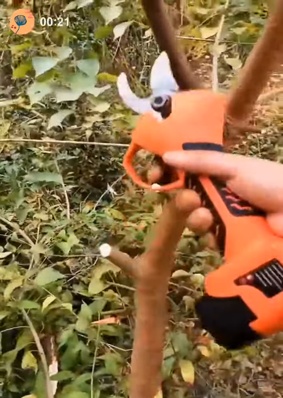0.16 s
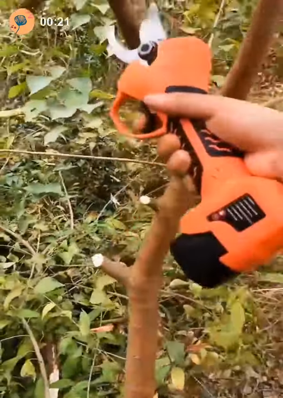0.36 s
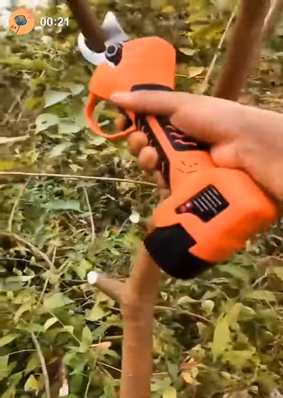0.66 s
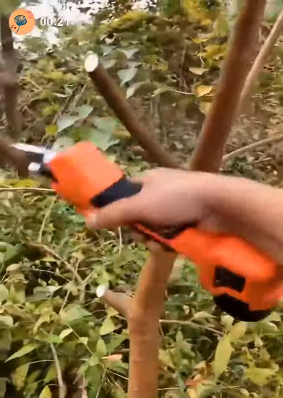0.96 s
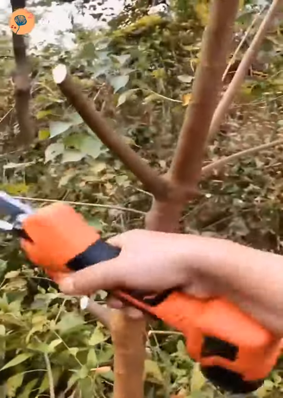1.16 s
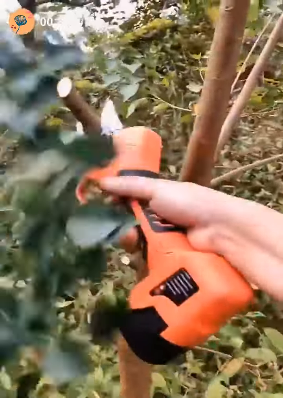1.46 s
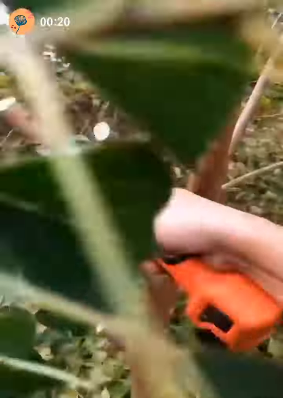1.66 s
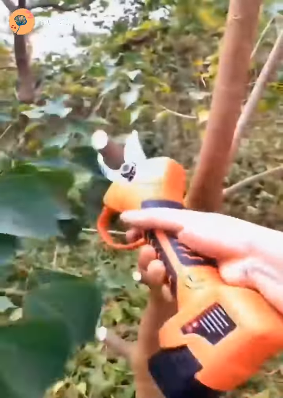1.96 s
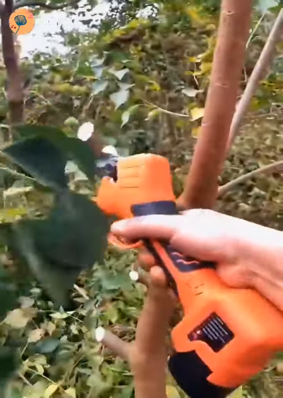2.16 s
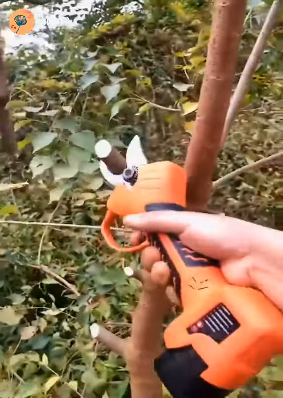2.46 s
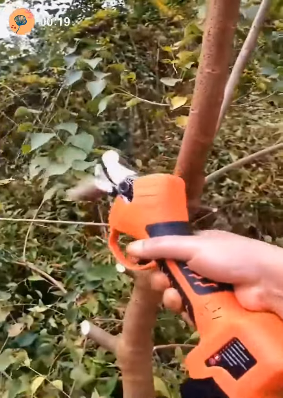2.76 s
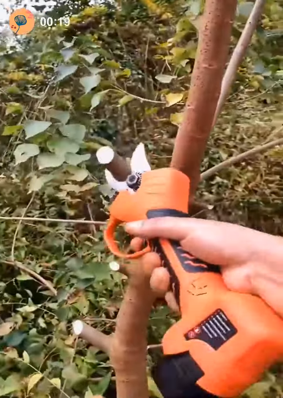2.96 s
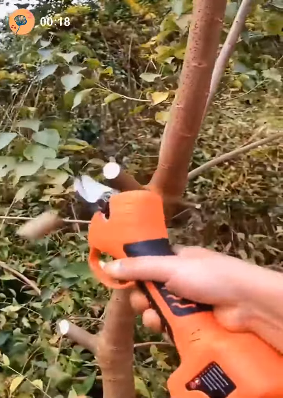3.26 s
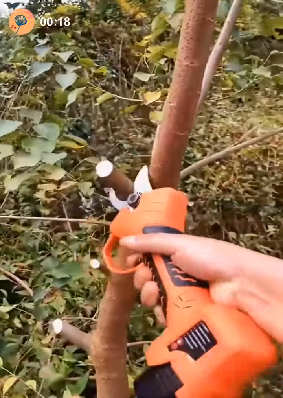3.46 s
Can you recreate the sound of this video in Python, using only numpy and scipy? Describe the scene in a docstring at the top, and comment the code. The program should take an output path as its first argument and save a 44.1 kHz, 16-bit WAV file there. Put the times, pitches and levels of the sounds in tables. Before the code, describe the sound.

An electric pruning shear, close and dry, mono, outdoors. Faint wind and leaf rustle until 0.7 s, when a click starts a shrill gear whine with rattle, about 0.2 s long; a steadier opening whirr follows at 0.97. Leaves hiss from 1.35; the cut at 1.5 drops a branch, knocking and rumbling at 1.67-1.9. Closing whines sag under load at 2.04, 2.56, 3.03 and 3.56, with opening whirrs between and small wood snaps.

```python
"""Cordless pruning shear among branches

A shear closes and opens in quick strokes. Each stroke starts with a click of gear slack; the gear whine,
partials on a mesh-speed curve, spins up and brakes, sagging while a closing blade bites. Gear rattle is
noise coloured by the housing. Knocks of wood are dying modes with a tick; a cut branch falls through
leaves, whose hiss breaks into crackles. Light wind is low, patchy noise."""
import sys
import numpy as np
from scipy import signal
from scipy.fft import rfft, irfft
from scipy.io import wavfile
from scipy.ndimage import uniform_filter1d

SR = 44100
rng = np.random.default_rng(int(sys.argv[2]) if len(sys.argv) > 2 else 0)


def voltage_ratio(decibels):
    """Convert decibels (scalar or array-like) to amplitude ratios, 20 dB per decade."""
    exponent = np.asarray(decibels, float) / 20
    return 10 ** exponent


def master(y):
    """Save y as 16-bit WAV."""
    cut = np.clip(np.atleast_2d(y).T, -1, 1)
    pcm = np.round(cut * 32767)  # scale
    wavfile.write(sys.argv[1], SR, pcm.astype(np.int16))


N = 158760
T = np.arange(N) / SR
WAIT_S, SPIN_UP_S, FREE_HZ = 0.012, 0.024, 3768  # trigger to motor start, run-up, unloaded mesh

# Closing strokes: trigger t/s, trigger to cut-through t/s, free run to brake t/s, mesh at full load f/Hz,
# whine level/dB
CLOSING_STROKES = [(.694, 0.184, 0.012, 2664, -15.5), (1.504, 0.18, 0.017, 2678, -15),
                   (2.042, 0.18, 0.023, 2555, -15), (2.557, 0.18, 0.0092, 2608, -15.5),
                   (3.028, .192, .024, 2563, -14.5), (3.564, .18, .02, 2600, -17.5)]
# Opening strokes: trigger t/s, trigger to brake t/s, whine level/dB
OPENING_STROKES = [(.973, .158, -17), (1.758, .157, -15.5), (2.296, .156, -17.5), (2.802, .155, -17),
                   (3.303, .153, -16)]
# Gear-train partials: multiple of mesh [1], free-running level/dB, full-load level/dB
GEAR_ORDERS = [(0.094, -20.5, -34.5), (.235, -16.5, -23.5), (.5, -23, -6.5), (0.753, -5.5, -5), (1, 1, 6.5),
               (1.068, -14, -9), (1.192, -28.5, -57), (2, -22, -13.5), (2.982, -20, -23), (3.168, -26, -28)]


def shear():
    """All strokes share one set of housing resonances and one gear train with 14 faint extra partials."""
    out = np.zeros(N)
    width = round(220 * N / SR)  # 220 Hz in bins
    bands = uniform_filter1d(rng.standard_normal(N // 2 + 1), size=width)
    bands = evened(uniform_filter1d(bands, size=width))
    faint_db = -27
    orders = [*GEAR_ORDERS, *((k, faint_db, faint_db) for k in rng.uniform(2.1, 4.1, size=14))]
    for start, to_cut, free, bite_hz, db in CLOSING_STROKES:
        cut = start + to_cut
        add(out, *stroke(start, cut, cut + free, bite_hz, db, True, bands, orders))
    for start, to_brake, db in OPENING_STROKES:
        brake = start + to_brake
        add(out, *stroke(start, brake, brake, FREE_HZ, db, False, bands, orders))
    return out


def stroke(start, cut, brake, bite_hz, db, closing, bands, orders):
    """Click, whine and rattle driven by one load and speed curve; placed 2 ms ahead of the trigger."""
    t = np.arange(start, min(brake + 0.12, N / SR), 1 / SR)
    full = start + WAIT_S + SPIN_UP_S
    load = closing * blade_load(t, full, cut)
    run = np.clip((t - start - WAIT_S) / SPIN_UP_S, 0, 1)
    braking = np.clip((t - brake) / (0.018 if closing else 0.035), 0, 1)
    speed, mesh_hz = gear_speed(t - full, run, braking, load, bite_hz, closing)
    turn = 2 * np.pi * np.cumsum(mesh_hz) / SR
    noise = housing_noise(bands)

    whine = gear_whine(mesh_hz, turn, load, orders)
    brake_drop_db = -6 * np.clip((t - brake) / 0.009, 0, 1)
    whine *= np.sqrt(2) * voltage_ratio(db + brake_drop_db) * np.clip(speed * 8, 0, 1) * run
    rattle = gear_rattle(t, start, brake, run, braking, load, turn, closing) * noise[:len(t)]
    click = slack_click(t - start, noise[-len(t):], closing)
    return start - 0.002, click + whine + rattle


# Blade load: share of the way from full speed to cut-through [1], load [0-1]
BITE_LOAD = [(0, 0.1), (.1, 0), (.22, .17), (.33, .45), (.43, 0.8), (.54, 0.81), (.7, 0.92), (.85, 0.98),
             (1, .7)]


def blade_load(t, full, cut):
    """Wood loads the blade along the cut, then frees it exponentially."""
    FREED_S = 0.0097
    return curve(BITE_LOAD, (t - full) / (cut - full)) * np.exp(-np.maximum(t - cut, 0) / FREED_S)


def gear_speed(since_full, run, braking, load, bite_hz, closing):
    """Relative speed and mesh rate: lagged run-up, sag with load, fall to a creep rate on braking."""
    SETTLE_S, CREEP_HZ, CLIMB_HZ_PER_S = 0.005, 1000, 490
    lag = np.exp(-1 / (SETTLE_S * SR))
    speed = signal.lfilter([1 - lag], [1, -lag], run) * (1 - braking)
    top_hz = FREE_HZ + CLIMB_HZ_PER_S * since_full * (not closing)
    loaded_hz = top_hz - (FREE_HZ - bite_hz) * load
    return speed, uniform_filter1d(CREEP_HZ + (loaded_hz - CREEP_HZ) * speed, size=150)


# Whine passed by the housing: f/Hz, level/dB
WHINE_GAIN_POINTS = [(300, -14.5), (1000, -14.5), (2000, -13.5), (2650, -10), (3250, -5), (3750, -3.5),
                     (3830, 0.5), (4600, 1), (5500, 3), (6800, 3.5), (7500, -2), (8200, -9), (10500, -2)]


def gear_whine(mesh_hz, turn, load, orders):
    """Partials at multiples of mesh, wavering in level and phase, plus a noise band around mesh."""
    WAVER_DB, WAVER_HZ = 2.5, 141
    JITTER_RAD, JITTER_LOAD_RAD, JITTER_HZ = 0.06, 0.18, 250  # at mesh; grows with the multiple
    FUZZ_DB, FUZZ_HZ = -19, 300
    waver, shake, fuzz = wobble(WAVER_HZ), wobble(JITTER_HZ), wobble(FUZZ_HZ)
    n = len(turn)
    at = rng.integers(0, N - n, (len(orders), 2))  # excerpts of the drifts
    fuzz_cos, fuzz_sin = fuzz[at[0, 0]:][:n], fuzz[at[0, 1]:][:n]
    whine = voltage_ratio(FUZZ_DB) * (fuzz_cos * np.cos(turn) + fuzz_sin * np.sin(turn))
    whine *= voltage_ratio(curve(WHINE_GAIN_POINTS, mesh_hz))
    for (k, free_db, load_db), (a, b) in zip(orders, at):
        part_db = free_db + (load_db - free_db) * load
        part_db = part_db + curve(WHINE_GAIN_POINTS, k * mesh_hz)
        part_db += WAVER_DB * np.clip(k, 1, 2) * waver[a:a + n]
        jitter = min(k, 2.4) ** 2 * (JITTER_RAD + JITTER_LOAD_RAD * load) * shake[b:b + n]
        whine += voltage_ratio(part_db) * np.cos(k * turn + a + jitter)  # a: arbitrary phase
    return whine


def gear_rattle(t, start, brake, run, braking, load, turn, closing):
    """Rattle envelope: rises with run-up, dips with load and braking, throbs once per shaft turn."""
    RATTLE_DB, LOAD_DB, BRAKING_DB, STILL_DB = -23, -2.5, -6, -9
    RASP_ORDER, RASP_DEPTH, FADE_DB_PER_S = 0.066, 0.3, -1200
    end = brake + (0.024 if closing else 0.052)
    on = np.clip((t - start) / 0.0019, 0, 1) * voltage_ratio(FADE_DB_PER_S * np.maximum(t - end, 0))
    level_db = RATTLE_DB + LOAD_DB * load + STILL_DB * (1 - run) + BRAKING_DB * braking
    return on * (1 + RASP_DEPTH * np.cos(RASP_ORDER * turn)) * voltage_ratio(level_db)


# Rattle through the housing: f/Hz, level per Hz/dB
HOUSING_SPECTRUM = [(300, -61), (900, -13), (1180, 2), (1900, -10), (2700, 3), (4100, 4), (4800, -1),
                    (5500, -4.5), (7300, -4.5), (8200, -10.5), (9000, -4.5), (11000, -5.5), (15500, -8)]


def housing_noise(bands):
    """Grainy noise coloured by the housing and combed by its many small resonances, rms 1."""
    grain = patchy(2) * voltage_ratio(-1.5 * wobble(210))
    return combed(coloured(grain, HOUSING_SPECTRUM), bands)


# Slack click modes: f/Hz, level before scatter and stroke level/dB
CLICK_MODES = [(1400, -29), (3800, -24), (4450, -6), (5450, -9.5), (6850, 0.5), (9500, -33), (11500, -29)]


def slack_click(u, noise, closing):
    """Gear slack taken up: housing modes and noise swell briefly, then die."""
    RISE_S, T60_S, SCATTER_DB = 0.0052, 0.022, 3
    click = voltage_ratio(2.5 - 60 * u / T60_S) * noise
    for hz, db in CLICK_MODES:
        mode_db = db + SCATTER_DB * rng.standard_normal()
        click += ring(np.maximum(u - RISE_S, 0), 0, mode_db, T60_S, turns=hz * u)  # decays after the rise
    return click * voltage_ratio(-24.5 if closing else -23) * np.minimum(u / RISE_S, 1)


# Wood snapping or knocking: t/s, body level/dB, body f/Hz, crack level/dB
WOOD_KNOCKS = [(.056, -34.5, 517, -35), (0.164, -26, 4600, -30), (1.354, -30, 1000, -34),
               (1.666, -15, 735, -33), (1.671, -16.5, 202, -40), (1.75, -17, 645, -10.5),
               (1.768, -9.5, 1000, -22), (1.777, -13, 850, -16), (1.843, -5.5, 874, -22),
               (1.85, -7.5, 513, -10), (1.86, -23, 88, -28), (1.866, -15.5, 392, -33),
               (2.223, -15.5, 1290, -24), (2.408, -20, 460, -28), (2.741, -11, 1420, -15),
               (3.226, -15, 1410, -26), (3.53, -21.5, 1074, -25)]
# Body modes: multiple of body pitch before random detuning [1], level/dB
BODY_MODES = [(1, 0), (1.35, -5), (2.1, -12)]


def wood():
    """Each knock rings a few modes around its body pitch with a short noise tick."""
    T60_1KHZ_S, TICK_T60_S, RISE_S = 0.024, 0.007, 0.00057
    out, t = np.zeros(N), np.arange(8000) / SR
    spreads = rng.uniform(-1.57, 1, (len(WOOD_KNOCKS), len(BODY_MODES)))
    for (s, db, hz, crack_db), spread in zip(WOOD_KNOCKS, spreads):
        t60 = T60_1KHZ_S * np.sqrt(1000 / hz)  # lower bodies ring longer
        body = sum(ring(t, hz * k * (1 + 0.11 * u), d, t60) for (k, d), u in zip(BODY_MODES, spread))
        noise = signal.lfilter([1, -1], np.poly([0.78, 0.8]), rng.standard_normal(len(t)))
        tick = voltage_ratio(crack_db - 60 * t / TICK_T60_S) * evened(noise)
        add(out, s, voltage_ratio(db) * np.minimum(t / RISE_S, 1) * body + tick)
    return out


# Branch rumble: t/s, level before flutter/dB
RUMBLE_LEVEL = [(1.64, -65), (1.67, -47.5), (1.77, -30.5), (1.87, -30), (1.98, -48), (2.05, -74)]
# Branch rumble: f/Hz, level per Hz/dB
RUMBLE_SPECTRUM = [(100, 2), (450, 4), (900, 3), (1800, 0), (4000, -48)]


def branch_rumble():
    """Low noise with a fluttering level as the branch falls."""
    level_db = curve(RUMBLE_LEVEL) + 4.7 * wobble(82)
    return voltage_ratio(level_db) * coloured(rng.standard_normal(N), RUMBLE_SPECTRUM)


# Leaves brushing: t/s, level/dB
RUSTLE_LEVEL = [(0, -46.5), (.155, -47.5), (.17, -46), (.36, -53.5), (.4, -40), (.56, -54), (.69, -52),
                (1.27, -46.5), (1.345, -39), (1.356, -32), (1.5, -28), (1.72, -32), (1.9, -48), (2, -40.5),
                (3.6, -40.5)]
# Leaf hiss: f/Hz, level per Hz/dB
LEAF_SPECTRUM = [(230, -14), (478, 1), (870, -7), (978, -4), (1970, -5), (5430, 1.5), (14200, -9.5),
                 (16000, -1)]


def leaves():
    """Hiss that breaks into small crackles: random ticks, each decaying, modulate noise."""
    TICKS_PER_S, TICK_SPREAD_DB = 1200, -1.5
    sizes = voltage_ratio(TICK_SPREAD_DB * np.minimum(rng.exponential(1, N), 5))
    ticks = (rng.random(N) < TICKS_PER_S / SR) * sizes
    grain = 0.13 + signal.lfilter([1], [1, -0.995], ticks) * 0.099
    return voltage_ratio(curve(RUSTLE_LEVEL)) * coloured(grain * patchy(1.7), LEAF_SPECTRUM)


# Wind and wash: f/Hz, level per Hz/dB
AIR_SPECTRUM = [(30, -40), (50, -4), (80, -2.5), (130, -6), (400, -12.5), (1800, -22.5), (3900, -15),
                (5200, -27.5), (16000, -56)]


def air():
    """Wind rumble and distant wash in slow gusts, with one stronger puff of low wind."""
    AIR_DB, GUST_DB, GUST_HZ = -46.5, 1, 4.6
    PUFF_S, PUFF_WIDTH_S, PUFF_DB = 0.62, 0.11, 7
    wash = coloured(patchy(2), AIR_SPECTRUM)
    low = signal.sosfilt(signal.butter(2, 160, fs=SR, output="sos"), wash)
    puff = voltage_ratio(PUFF_DB * np.exp(-((T - PUFF_S) / PUFF_WIDTH_S) ** 2)) - 1
    return voltage_ratio(AIR_DB + GUST_DB * wobble(GUST_HZ)) * (wash + puff * low)


def evened(x):
    """Scales to rms 1."""
    return x / np.sqrt(np.mean(x ** 2) + 1e-20)


def curve(points, t=T):
    """Joins (x, y) points by straight lines."""
    return np.interp(t, *np.transpose(points))


def coloured(x, spectrum):
    """Filters x by (f/Hz, level/dB) points joined over log frequency, rms 1."""
    hz = np.fft.rfftfreq(len(x), 1 / SR)
    f, db = np.transpose(spectrum)
    gain = voltage_ratio(np.interp(np.log(hz + 1), np.log(f), db, left=-90))
    return evened(irfft(rfft(x) * gain, len(x)))


def combed(x, bands):
    """Passes x through a fixed set of narrow peaks and dips, rms 1."""
    return evened(irfft(rfft(x) * voltage_ratio(1.8 * bands), len(x)))


def patchy(depth_db):
    """Noise whose level wanders in patches of time and pitch."""
    z = signal.stft(rng.standard_normal(N), nperseg=512, noverlap=384)[2]
    field = uniform_filter1d(rng.standard_normal(z.shape), size=6, axis=0)
    field = uniform_filter1d(field, size=12, axis=1)
    return signal.istft(z * voltage_ratio(depth_db * evened(field)), nperseg=512, noverlap=384)[1][:N]


def wobble(hz):
    """Random drift up to about hz, rms 1."""
    return evened(signal.sosfilt(signal.butter(2, hz, fs=SR, output="sos"), rng.standard_normal(N)))


def ring(t, hz, db, t60, turns=0):
    """One dying mode; turns adds phase in cycles."""
    return voltage_ratio(db - 60 * t / t60) * np.sin(2 * np.pi * (hz * t + turns))


def add(mix, s, sound):
    """Mixes sound in at s seconds."""
    part = mix[round(s * SR):][:len(sound)]
    part += sound[:len(part)]


def scene():
    """All sources on one channel."""
    return (shear() + wood() + branch_rumble() + leaves() + air())[None]


def roll_off(x):
    """The treble ends steeply here."""
    return signal.sosfilt(signal.butter(12, 16090, fs=SR, output="sos"), x)


def record(dry):
    """Band-limits and finishes the mix: low-pass at 16 kHz, high-pass at 45 Hz."""
    lowpass = signal.firwin(511, 16000, window=("kaiser", 9), fs=SR)
    mix = signal.oaconvolve(dry, lowpass[None], "same")
    mix = signal.sosfilt(signal.butter(2, 45, "high", fs=SR, output="sos"), mix)
    return roll_off(mix)


dry = scene()
out = record(dry)
master(out)
```